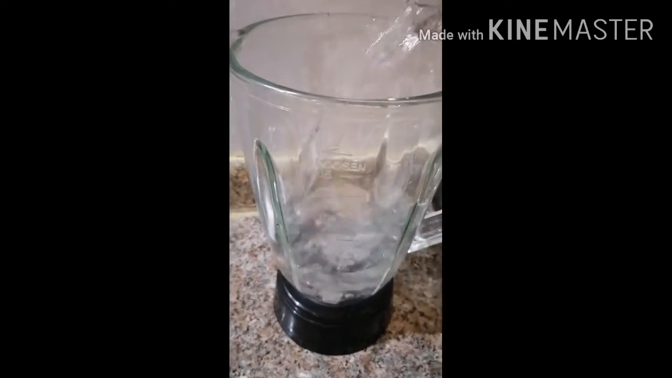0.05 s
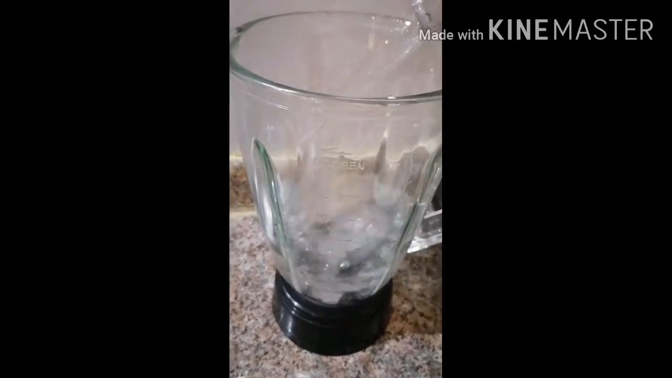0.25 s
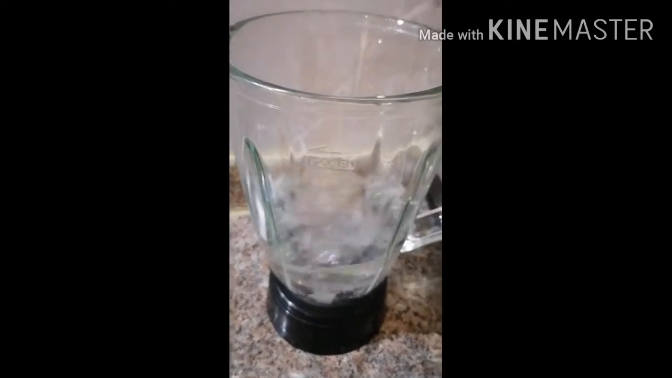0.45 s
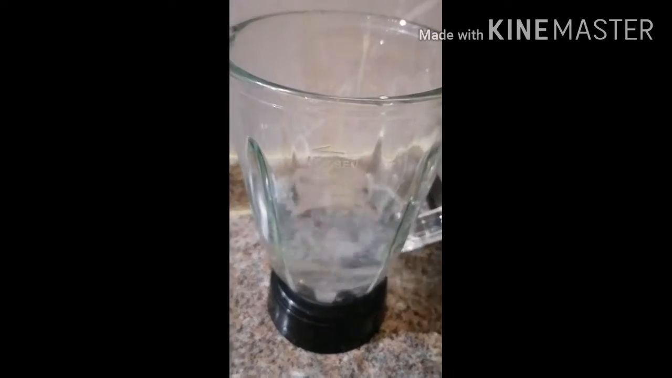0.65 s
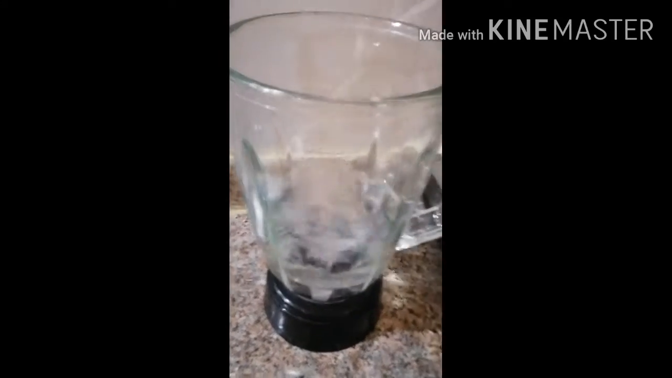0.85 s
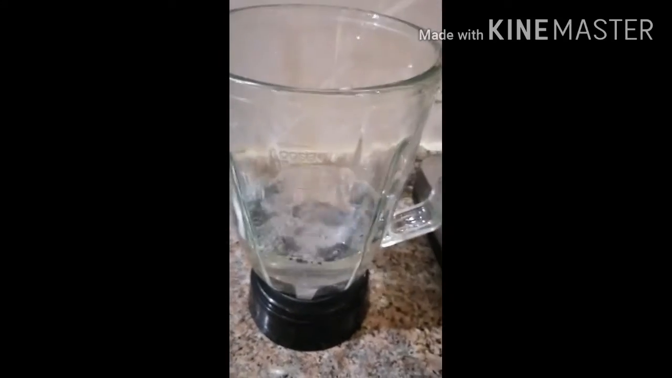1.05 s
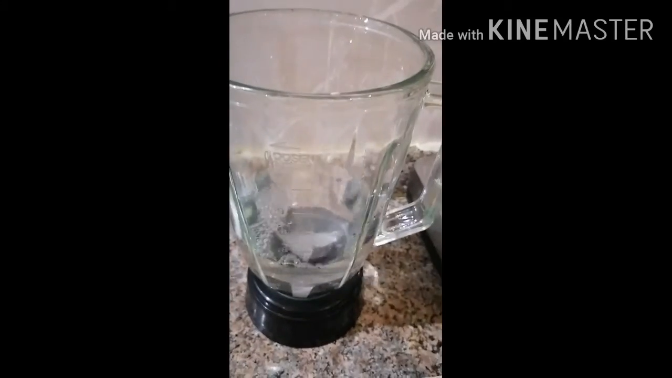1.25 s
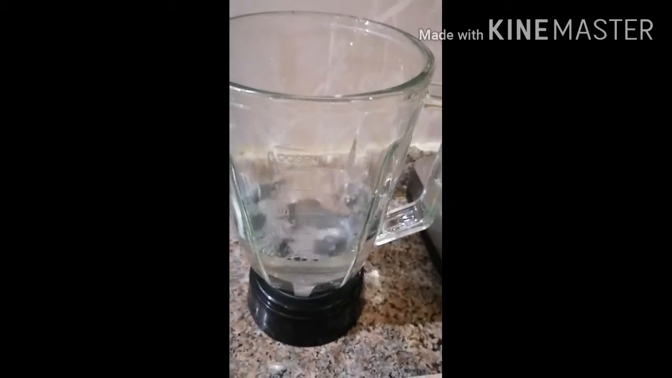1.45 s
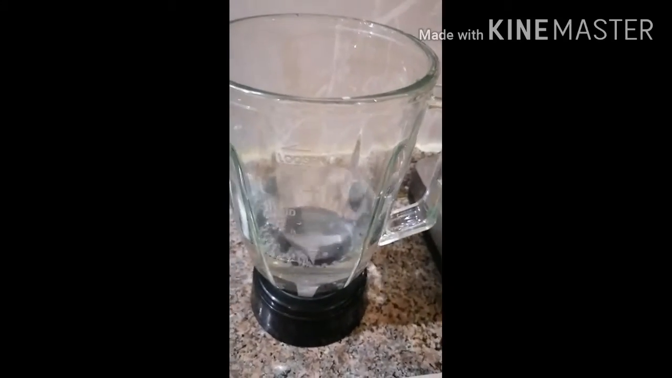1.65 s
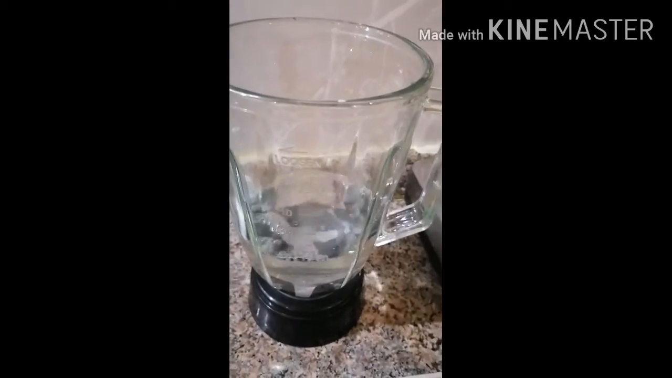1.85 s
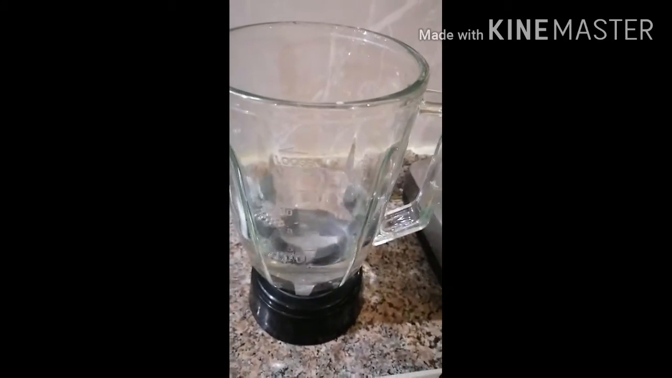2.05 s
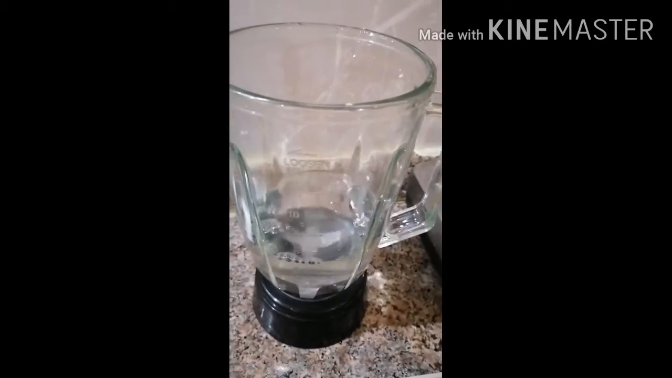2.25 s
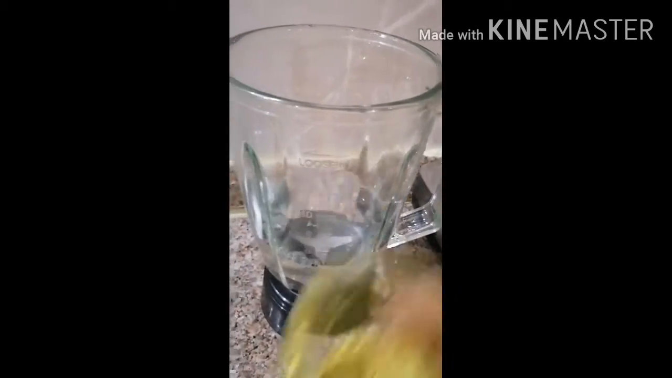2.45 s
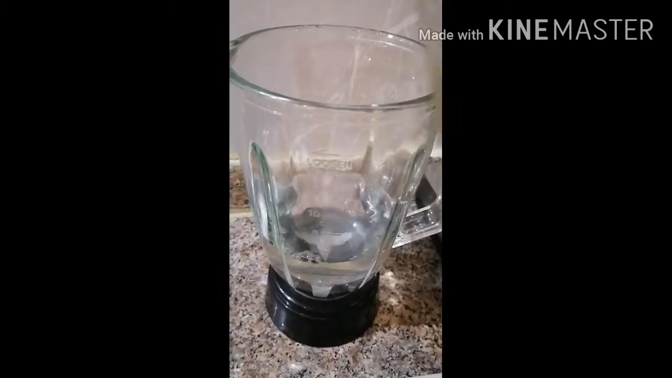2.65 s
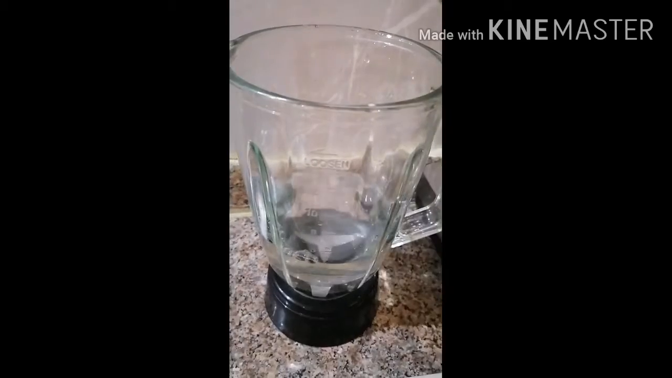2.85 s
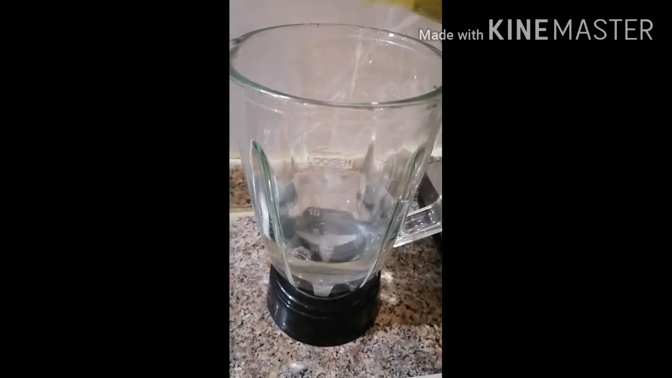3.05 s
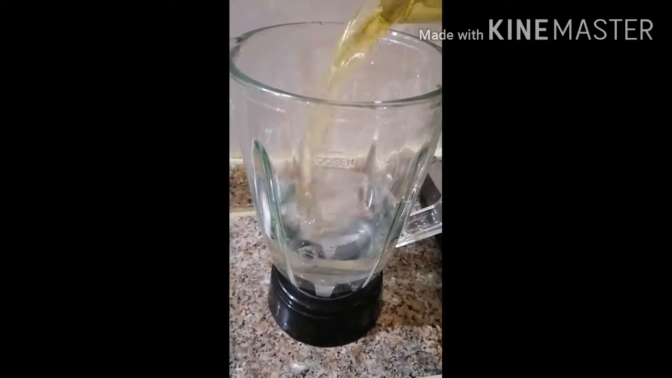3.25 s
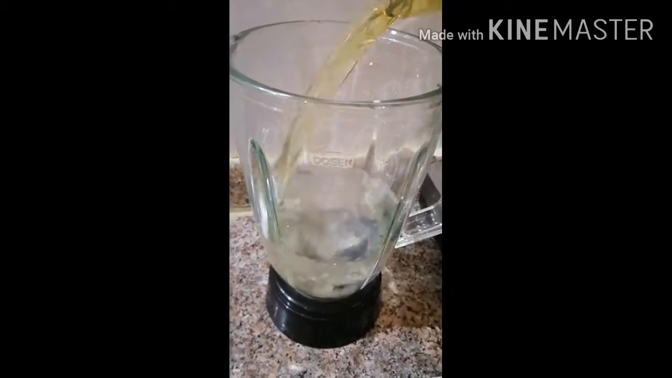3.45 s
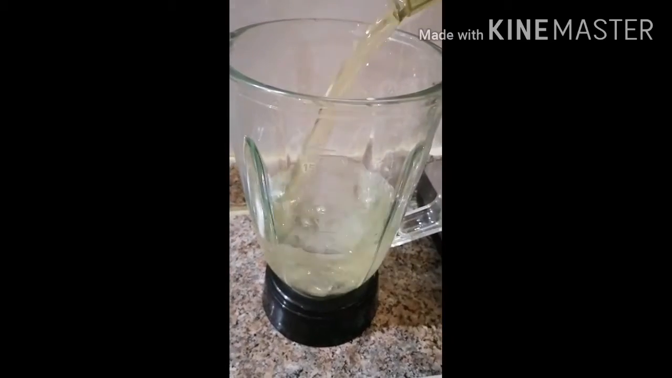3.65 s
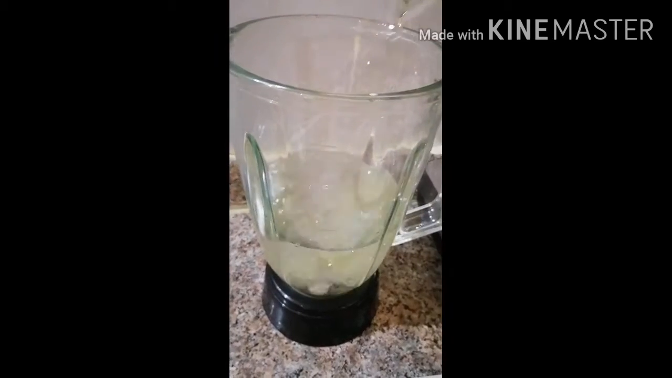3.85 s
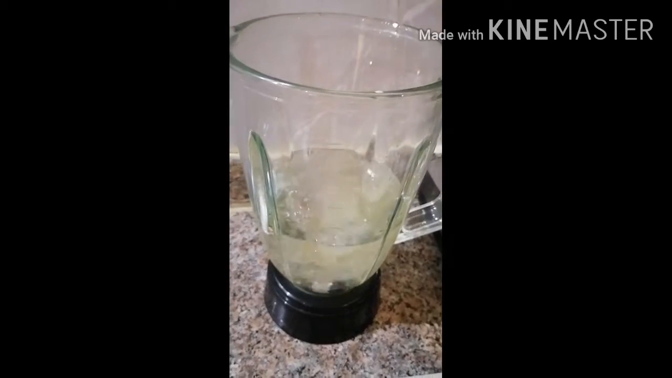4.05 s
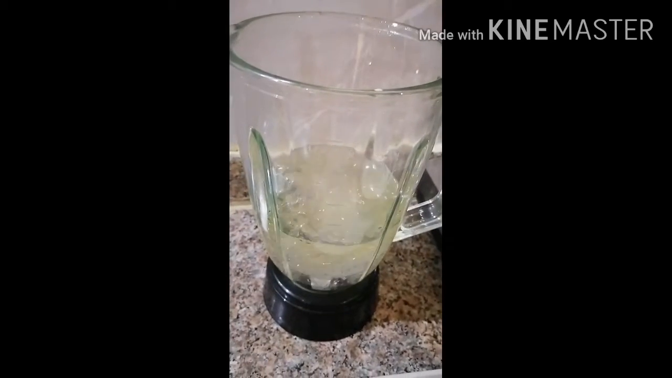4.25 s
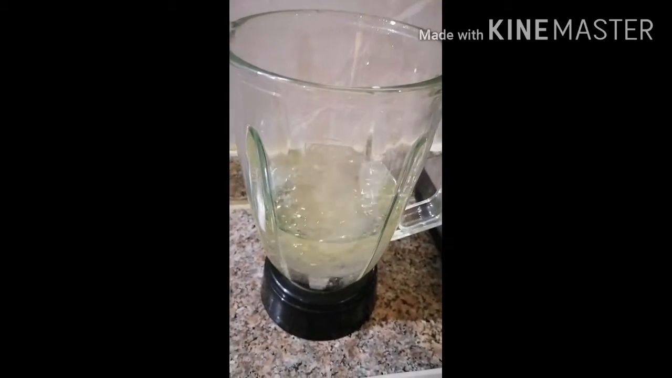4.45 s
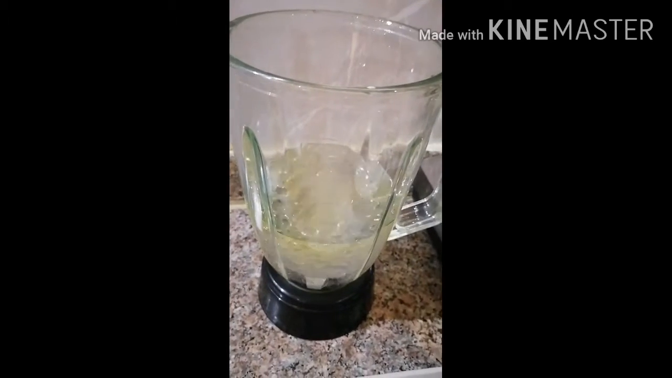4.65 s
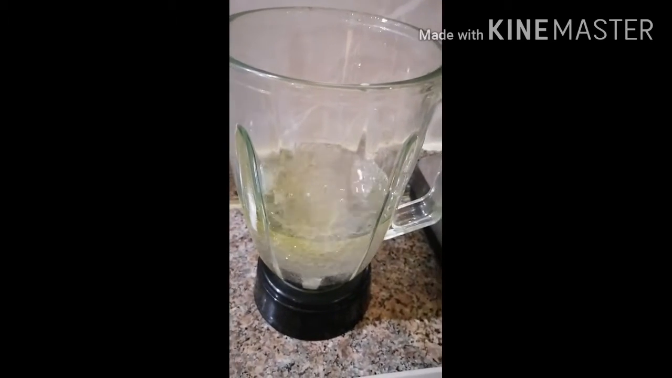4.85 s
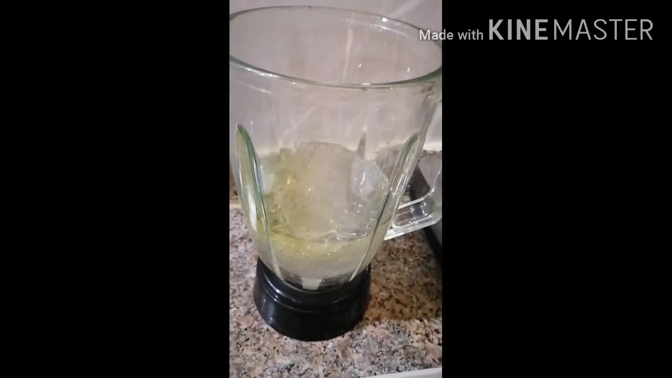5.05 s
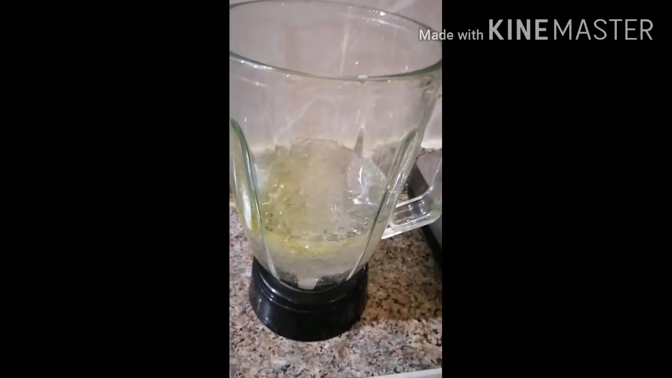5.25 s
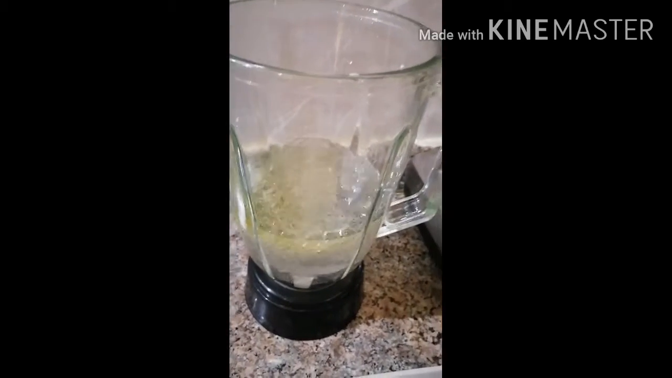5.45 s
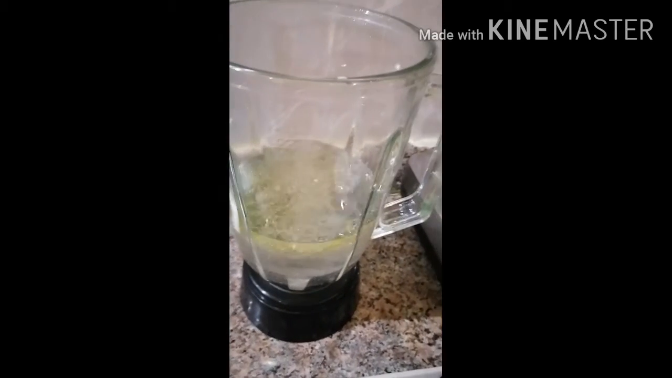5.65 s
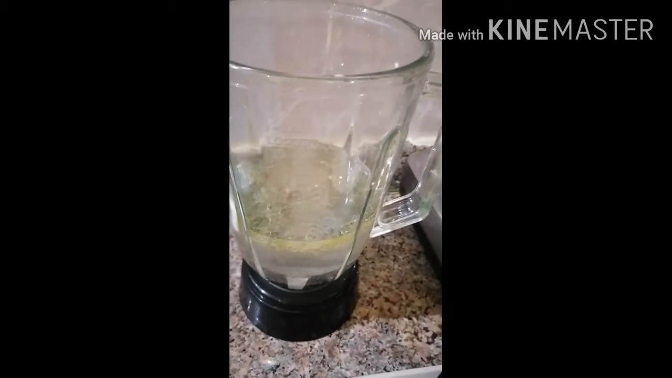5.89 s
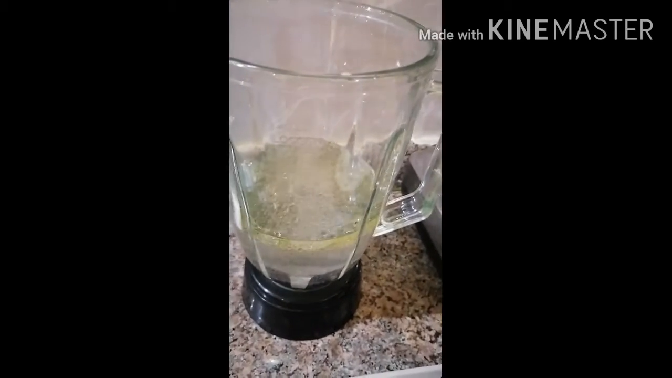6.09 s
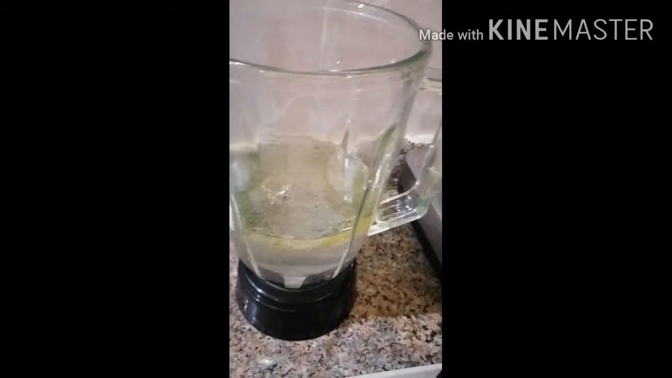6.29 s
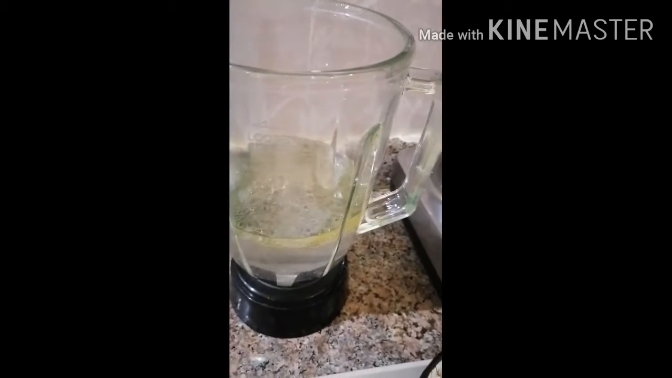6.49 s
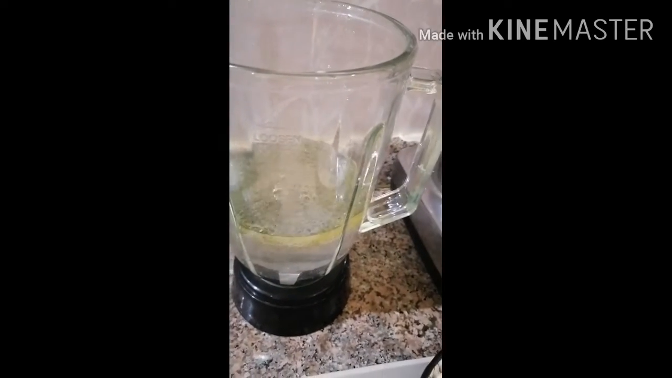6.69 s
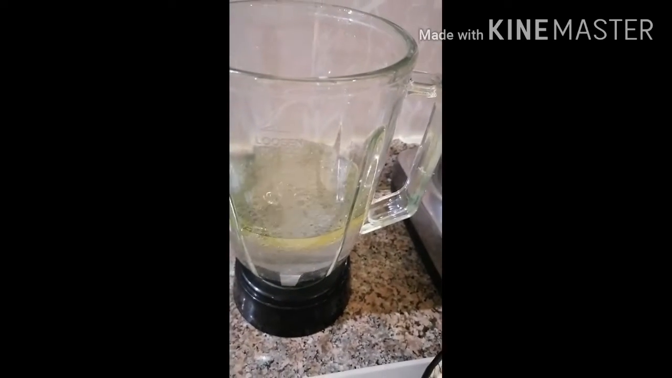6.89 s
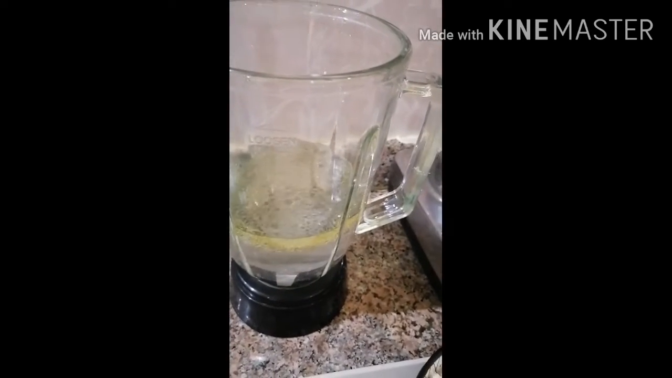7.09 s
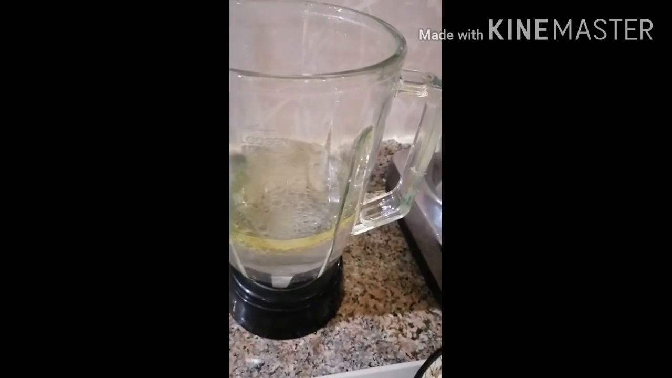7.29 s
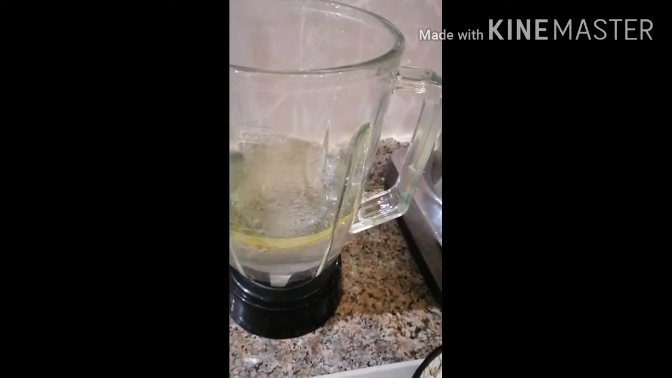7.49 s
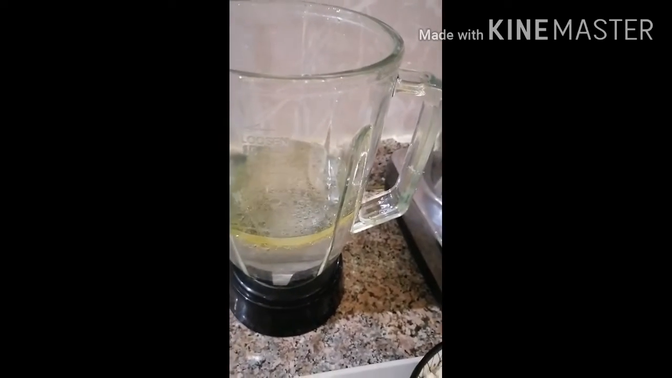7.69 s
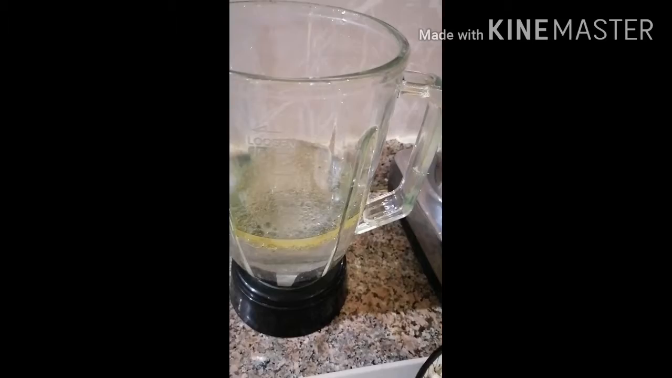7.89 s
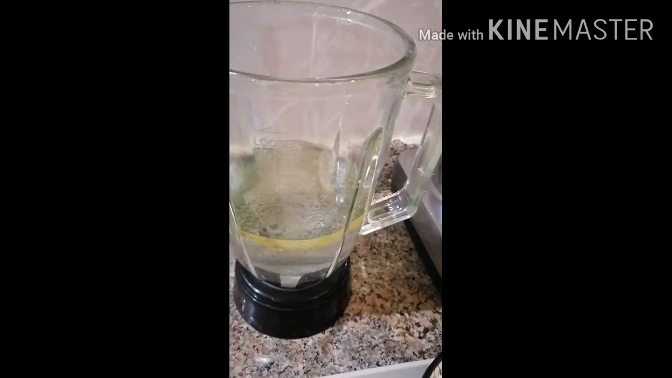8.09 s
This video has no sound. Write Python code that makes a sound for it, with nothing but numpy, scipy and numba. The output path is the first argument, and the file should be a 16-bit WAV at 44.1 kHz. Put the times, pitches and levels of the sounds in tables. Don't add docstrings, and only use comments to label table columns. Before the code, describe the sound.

Close to a phone in a hard, echoing kitchen, water gurgles and splashes into a glass jar, thinning to drips and popping foam. A jug lands with a sharp ringing knock. After a quieter gap, oil plops in briefly and dribbles out. A bottle is set down hard, and a small cap rattles at the end. A low motor hum and wavering duct howl continue behind.

```python
import sys
import numpy as np
from scipy import signal
from scipy.fft import irfft, next_fast_len
from scipy.io import wavfile
from scipy.ndimage import uniform_filter1d
from numba import njit

SR = 44100
rng = np.random.default_rng(int(sys.argv[2]) if len(sys.argv) > 2 else 0)


def decibels_to_gain(level_db):
    exponent = np.asarray(level_db, float) / 20
    return 10 ** exponent


def store_pcm(level_fs):
    pcm = np.round(np.clip(level_fs, -1, 1) * 32767).astype(np.int16)
    wavfile.write(sys.argv[1], SR, np.atleast_2d(pcm).T)


N = 358517

SHAFT_HZ = 59.045
# pitch in Hz, left minus right in dB.
LEFT_MINUS_RIGHT = [(60, 7.5), (200, 3), (400, 1), (700, 5), (1300, -1.5), (15000, 4.5)]
# start in seconds, blow in dB, contact in ms.
JUG_BLOWS = [
    (1.4497, -10, 0.47),
    (1.7555, -20.5, 1.64),
    (1.7975, -19.5, 1.43),
]


def on_hz(table, hz):
    pitch, value = np.array(table).T[:2]
    return np.interp(np.log(hz), np.log(pitch), value)


def on_time(table, s, off_db=-130):
    at, *columns = np.transpose(table)
    return [np.interp(s, at, column, off_db, off_db) for column in columns]


def walk(rate):
    hold = int(SR / rate)
    steps = np.repeat(rng.standard_normal(N // hold + 1), hold)
    return 1.195 * uniform_filter1d(uniform_filter1d(steps, hold), hold)[:N]


def band(hz, width, size=N):
    n = next_fast_len(size)
    bins = np.arange(n // 2 + 1)
    bell = np.exp(-.5 * ((bins * SR / n - hz) / (width / 2)) ** 2)
    x = irfft(bell * np.exp(2j * np.pi * rng.random(len(bins))), n)[:size]
    return x / np.std(x)


@njit
def ring(rows):
    out = np.zeros((2, N + 64))
    for s, hz, t60, rise, glide, left, right, lead in rows:
        fade, swell = np.exp(-np.log(1000) / (t60 * SR)), np.exp(-1 / (rise * SR))
        i, lag = int(s * SR) + 16, int(lead * SR)
        a, b, phase = 1., 1., 0.
        for k in range(i, min(i + int(t60 * SR), N)):
            phase += 2 * np.pi * hz * (1 + glide * (k - i) / SR) / SR
            a, b = a * fade, b * swell
            v = a * (1 - b) ** 2 * np.sin(phase)
            out[0, k] += left * v
            out[1, k + lag] += right * v
    return out[:, 16:N + 16]


def ring_rows(s, hz, t60, db, rise=.0003, glide=0., pan_db=0., lead=0.):
    hz = np.clip(hz, 30, .4 * SR)
    left, right = decibels_to_gain(db + pan_db / 2), decibels_to_gain(db - pan_db / 2)
    columns = np.broadcast_arrays(s, hz, np.maximum(t60, 2 / hz), rise, glide, left, right, lead)
    return np.stack(columns, -1).reshape(-1, 8)


def burst(s, db, hz, octaves, spread_s, t60, pan_db, count):
    draw = rng.standard_normal((len(s), count, 4))
    late = spread_s * np.abs(draw[..., 0]) ** 1.5
    hz = hz[:, None] * 2 ** (octaves * draw[..., 1])
    pan_db = pan_db + 3 * draw[..., 2]
    lead = .0002 + .00015 * draw[..., 3]
    return ring_rows(s[:, None] + late, hz, t60, db[:, None], 0.000067, 0., pan_db, lead)


def motor():
    # pitch in Hz, width in Hz, level in dB
    lines = [
        (58.8, 1.5, 1.5),
        (92.64, 2.48, -6.5),
        (122, 61, -10),
        (370, 47, -19.5),
    ]
    t = np.arange(N) / SR
    rumble = sum(decibels_to_gain(db) * band(hz, width) for hz, width, db in lines[1:])
    shaft = np.sqrt(2) * decibels_to_gain(lines[0][2] + 0.33 * walk(4.6)) * np.sin(2 * np.pi * SHAFT_HZ * t)
    return (rumble + shaft) * decibels_to_gain([[2.2], [-2.4]])


def compressor_buzz():
    # multiple of the shaft rate, left in dB, right in dB over the hum.
    multiples = [(2, -13, -18), (3, -12, -16), (4, -17, -18), (6, -19, -15), (8, -14, -9), (12, -27, -31),
                 (14, -34, -30), (18, -37, -35), (22, -33, -35), (24, -39, -35), (25, -42, -32),
                 (26, -35, -26), (36, -36, -34), (38, -38, -39), (40, -37, -36), (41, -34, -32),
                 (42, -28, -31), (43, -28, -31), (44, -44, -32), (45, -35, -34), (47, -33, -37),
                 (48, -37, -39), (52, -48, -35), (57, -38, -35), (82, -38, -37), (90, -46, -33),
                 (112, -42, -36), (113, -39, -39), (117, -48, -32), (119, -41, -37), (129, -37, -39)]
    turn = 2 * np.pi * np.cumsum(SHAFT_HZ * (1 + .00015 * walk(1.5))) / SR
    out = np.zeros((2, N))
    for k, left, right in multiples:
        phase = 2 * np.pi * (rng.random() + min(k / 40, 1) * rng.random((2, 1)))
        out += np.sqrt(2) * decibels_to_gain([[left], [right]]) * np.sin(k * turn + phase)
    return out


def rushing_air():
    # pitch in Hz, width in Hz, level in dB.
    whistles = [(2615, 130, -26), (5200, 390, -29.5), (6840, 2000, -23)]
    # pitch in Hz, level in dB per Hz.
    colour = [(15, -30), (36, -9.5), (69, -9), (130, -12.5), (287, -22.5), (453, -14), (576, -29.5),
              (862, -26), (1040, -30), (1930, -36), (2450, -33.5), (3670, -44.5), (6800, -50), (9130, -53),
              (15200, -53)]
    # pitch in Hz, left-right likeness from -1 to 1.
    likeness = [(60, 0.77), (130, 0.97), (300, 0.68), (650, 0.085), (1400, -0.3), (3000, -0.034)]
    air = np.zeros((2, N))
    for hz, width, db in whistles:
        air += decibels_to_gain(db + 2 * walk(2.46)) * np.array([band(hz, width), band(hz, width)])
    for hz in 30 * 2 ** np.arange(0, 9.1, 1 / 3):
        alike = np.clip(on_hz(likeness, hz), -1, 1)
        mid = np.sqrt(1 + alike) * band(hz, hz / 4)
        side = np.sqrt(1 - alike) * band(hz, hz / 4)
        db = -4.5 + on_hz(colour, hz) + 10 * np.log10(hz / 100) + 0.25 * walk(16)
        balance = decibels_to_gain(np.array([[.5], [-.5]]) * on_hz(LEFT_MINUS_RIGHT, hz))
        air += decibels_to_gain(db) * balance * np.array([mid + side, mid - side])
    return air


def howl():
    # pitch in Hz, level in dB.
    resonances = [(437, 0), (470, -8)]
    core = sum(decibels_to_gain(db) * band(hz, 26) for hz, db in resonances)
    return decibels_to_gain(-3.5 + 0.82 * walk(30)) * (core + decibels_to_gain(-7.5) * band(444.3, 60))


def duct():
    # middle in seconds, peak in dB over the hum.
    swells = [(.11, -3), (.25, -4), (.47, 6.5), (.62, -2), (.88, 5.5), (1.17, -1.5), (1.4, -0.5),
              (1.78, -20), (2.16, -18), (2.38, 1.5), (2.607, 5.5), (2.909, 0), (3.17, -2), (3.67, 8),
              (3.98, 7.5), (4.2, 2), (4.54, 6), (4.77, -14), (5.04, 5), (5.24, 5.5), (5.62, 5.5),
              (5.99, -0.5), (6.21, -10), (6.64, 7.5), (7.05, 6), (7.2, -14), (7.29, 7.5), (7.365, 11),
              (7.602, 1), (7.78, -7), (8.0, 3), (8.13, -23)]
    # multiple of the howl pitch, level in dB.
    overtones = [(1.92, -22.5), (2.849, -34.5)]
    gust_s, calm_db = 0.066, -2
    t = np.arange(N) / SR
    gusts = decibels_to_gain(calm_db) + sum(decibels_to_gain(db) * np.exp(-.5 * ((t - s) / gust_s) ** 2) for s, db in swells)
    right, other = howl(), howl()
    voice = np.array([.35 * right + .75 * other, 1.8 * right])
    for k, db in overtones:
        voice += decibels_to_gain(db + 2.0 * walk(12.0)) * np.array([band(440 * k, 40), band(440 * k, 53)])
    return gusts * voice


def appliance():
    # time in seconds, hum in dB as the gain control passes it.
    hum = [(0, -57.5), (.4, -53), (1.44, -50), (1.47, -71.5), (1.72, -55.5), (1.95, -55), (3.5, -55.5),
           (3.9, -52), (6.9, -50.5), (7.05, -52), (8.13, -50)]
    hum_db, = on_time(hum, np.arange(N) / SR)
    return decibels_to_gain(hum_db) * (motor() + rushing_air() + compressor_buzz() + duct())


def kitchen(x):
    # pitch in Hz, seconds to fade by 60 dB.
    fade_s = [(100, 0.63), (800, 0.59), (2500, 0.65), (6000, 0.63), (12000, 0.43)]
    # pitch in Hz, level in dB.
    colour = [(100, -8), (400, 7), (900, -3), (1700, 4.5), (3100, 0.5), (3800, -9), (5000, 8.5), (8000, 16),
              (12000, 5)]
    t = np.arange(SR) / SR
    tail = np.zeros((2, SR))
    for hz in 90 * 2 ** np.arange(0, 7.5, .25):
        fade = decibels_to_gain(on_hz(colour, hz) - 60 * t / on_hz(fade_s, hz))
        fade = fade * np.minimum(t / 0.0013, 1)
        noise = np.array([band(hz, hz / 5, size=SR) for _ in range(2)])
        tail += np.sqrt(hz / SR / 2) * fade * noise
    return signal.fftconvolve(x, tail, axes=1)[:, :N]


def struck(blows, modes, lead_ms, room_db):
    s, blow_db, contact_ms = np.array(blows).T[..., None]
    hz, db, t60 = np.transpose(modes)
    db = blow_db + db - 10 * np.log10(1 + (hz * contact_ms / 2000) ** 4)
    pan_db = on_hz(LEFT_MINUS_RIGHT, hz)
    direct = ring_rows(s, hz, t60, db, contact_ms / 1000, pan_db=pan_db, lead=lead_ms / 1000)
    crack = ring_rows(s, hz, 15 / hz, db + room_db, contact_ms / 3000)
    return direct, crack


def cap_rattle():
    # start in seconds, blow in dB, contact in ms.
    bounces = [(7.9945, -36, 0.29), (8.004, -37.5, 0.48), (8.0175, -56, 0.41), (8.032, -43, 0.33),
               (8.0415, -32, 0.27), (8.0665, -53, 0.55), (8.075, -36.5, 0.45)]
    # pitch in Hz, level in dB, ring in seconds.
    cap_modes = [(1110, -8, 0.022), (1910, 4.5, 0.0077), (3270, 10.5, 0.0074), (4100, 1.5, 0.029),
                 (4800, 1, 0.016), (6750, 1.5, 0.0047)]
    return struck(bounces, cap_modes, .15, room_db=-44.0)


def bottle_set_down():
    # start in seconds, blow in dB, contact in ms.
    blows = [
        (7.0185, -8.5, 0.56),
        (7.0325, -16, 0.77),
        (7.045, -15, 2.9),
        (7.285, -21, 3.3),
    ]
    # pitch in Hz, level in dB, ring in seconds.
    bottle_modes = [(157, -26.5, 0.17), (212, -17.5, 0.088), (250, -17.5, 0.075), (415, -24.5, 0.21),
                    (650, -24.5, 0.2), (846, 2, 0.026), (980, -7, 0.032), (738, -34, 0.5),
                    (1160, -36, 0.26), (1400, -13.5, 0.031), (1780, -13.5, 0.017), (2130, -36, 0.37),
                    (2135, -38, 0.59), (3520, -29.5, 0.027)]
    return struck(blows, bottle_modes, 0.12, room_db=-37.0)


def jug_set_down():
    # pitch in Hz, level in dB, ring in seconds.
    jug_modes = [(193, -20.5, 0.047), (274, -27.5, 0.14), (824, -16.5, 0.13), (1100, -3.5, 0.011),
                 (950, -1, 0.02), (1557, -8.5, 0.019), (1692, -0.5, 0.016), (2444, 1.5, 0.014),
                 (2650, 4, 0.016), (2830, -2.5, 0.016), (4580, -9, 0.043), (5200, -10.5, 0.018),
                 (6320, -2, 0.0078), (7930, -16, 0.056)]
    return struck(JUG_BLOWS, jug_modes, -.1, room_db=-41.5)


def jar_rings_on():
    # pitch in Hz, level in dB, ring in seconds.
    jar_modes = [(813, -36.5, 0.67), (979, -35.5, 0.36), (1336, -14, 0.036), (1670, -42.5, 0.9),
                 (1733, -37.5, 0.41), (2000, -44, 0.473), (2320, -37.5, 0.43), (2460, -39.5, 1.4),
                 (2870, -36.5, 0.32), (2750, -60, .35), (2880, -41, 0.84), (2890, -40.5, .49),
                 (3100, -33, .28), (3250, -35.5, 0.96)]
    return struck(JUG_BLOWS, jar_modes, -.1, room_db=-28.5)


def glass_touches():
    # start in seconds, blow in dB, contact in ms.
    touches = [
        (0.0, -38.5, 0.92),
        (3.588, -42, 2.5),
        (6.388, -32.5, 0.31),
    ]
    # pitch in Hz, level in dB, ring in seconds.
    touch_modes = [
        [(1015, 0, .6), (930, -3, .4), (520, -12, .3)],
        [(925, 0, .45)],
        [(7830, 0, .2), (10300, -6, .05)],
    ]
    parts = [struck([blow], modes, .2, room_db=-38) for blow, modes in zip(touches, touch_modes)]
    return [np.concatenate(part) for part in zip(*parts)]


def swarm(layer, rate, scatter_db, patchy_db):
    # time in seconds, flow in dB, plunge depth from 0 to about 1.
    pours = [
        [(0, -42.5, 0.21), (.13, -42.5, 0.46), (.22, -47, 0.3), (.45, -44.5, 0.24), (.61, -45.5, 0.35),
         (.69, -62, 0.65), (.8, -65, 0.33), (1.1, -59, 0), (1.43, -63, 0)],
        [(3.5, -52, 0.15), (3.56, -59, 0.57), (3.75, -67, 0.7), (3.85, -81, 1.1), (4.08, -84.5, 0.73),
         (4.2, -71, 0.33), (4.6, -67.5, 0.02), (4.82, -69.5, 0), (4.95, -100, 1)],
    ]
    # dB over the flow for water, the same for oil, dB gained by a deep plunge.
    layers = [
        (-24.5, -10, 35.5),
        (-19.5, -15.5, 26),
        (-2, 4.5, 2.5),
        (-9, -2, -8),
    ]
    draw = rng.random((int(rate * N / SR), 4)).T
    s = draw[0] * (N - 1) / SR
    *liquid_db, deep_db = layers[layer]
    levels = []
    for pour, liquid in zip(pours, liquid_db):
        curve = [(at, flow + liquid + deep_db * depth) for at, flow, depth in pour]
        levels.append(on_time(curve, s)[0])
    db = np.max(levels, axis=0) - scatter_db * np.log(draw[1])
    db = db + patchy_db * walk(90)[(s * SR).astype(int)]
    heard = db > -95
    return s[heard], db[heard], draw[2][heard], draw[3][heard]


def jar_air(layer, modes, rate, t60, gain_db, pan_db):
    s, db, pick, off = swarm(layer, rate, scatter_db=1.4, patchy_db=3.0)
    hz, width, mode_db = np.array(modes)[(pick * len(modes)).astype(int)].T
    hz = hz + 2.5 * (1 + 1.2 * np.exp(-s / .15)) * width * (off - .5)
    t60 = t60 * (1.16 + (7 * off) % 1)
    return ring_rows(s, hz, t60, db + mode_db + gain_db, 0.00054, 0.67, pan_db, 0.00025)


def gurgle():
    # pitch in Hz, width in Hz, level in dB.
    low_modes = [(571.6, 113.5, -5), (769, 85.5, -0.5), (908, 130, -16)]
    return jar_air(0, low_modes, rate=320, t60=0.11, gain_db=-2.5, pan_db=9.5)


def splash():
    # pitch in Hz, width in Hz, level in dB.
    high_modes = [(1328, 169, -13), (1750, 150, 3.5), (2134, 180, -13), (2480, 226, 7), (3192, 146, 2.5),
                  (4395, 360, -2.5)]
    return jar_air(1, high_modes, rate=2600, t60=0.035, gain_db=-0.5, pan_db=6.0)


def spray():
    # pitch in Hz, level of a drop in dB.
    colour = [(4000, -26.5), (5200, -1), (7200, 4), (8500, 0), (10500, -10.5)]
    s, db, pick, off = swarm(2, rate=3500, scatter_db=2.2, patchy_db=4.5)
    hz = 4000 * 2.6 ** pick
    db = db + on_hz(colour, hz) - 8.0
    drops = ring_rows(s, hz, 0.013, db, 0.00022, 0., 7 + 8 * (off - .5), .0004 * (pick / off % 1))
    s, db, pick, off = swarm(3, rate=3000, scatter_db=2.5, patchy_db=4.0)
    hz = 10000 + 5600 * pick
    mist = ring_rows(s, hz, 0.0048, db, 0.00026, 0., 3.0 + 8 * (off - .5), .0002)
    return np.concatenate([drops, mist])


def spatter():
    # start in seconds, peak in dB, top octave in dB, centre in Hz.
    water_drops = [(0.0293, -23.5, -32, 8230), (0.0817, -33, -14, 8160), (0.1177, -28, -10, 6600),
                   (.134, -41, -20, 7000), (.158, -40, -20, 8000), (0.169, -25, -38, 7000),
                   (.184, -32.5, -25, 7200), (0.2334, -40, -19, 7200), (0.261, -39, -6, 6350),
                   (0.2912, -32, -12, 7950), (.346, -41, -15, 9500), (0.3577, -39, -28, 7100),
                   (0.375, -32.5, -12, 8360), (0.415, -37, -14, 6530), (0.4648, -38, -9, 9100),
                   (0.538, -33, -19, 7310), (0.5901, -29, -12, 8250), (.604, -28, -25, 6200),
                   (.62, -32, -25, 7000), (0.6399, -37, -12, 6760), (0.664, -33, -11, 6950),
                   (0.6775, -36, -23, 7600), (.694, -39, -20, 5800), (0.7108, -55, 4, 9000),
                   (0.7592, -44, -14, 8250), (0.8364, -48.5, -4, 7800), (0.8748, -44.5, -4, 8000),
                   (0.9867, -53, -10, 8400)]
    last_dribble = [(4.1543, -36.5, -30, 7000), (4.16, -47, -12, 9600), (4.2031, -44, -25, 7100),
                    (4.212, -44, -8, 7500), (4.227, -41, -26, 7750), (4.265, -45, -11, 7200),
                    (4.2834, -35.5, -22, 8100), (4.3408, -46, -5, 9700), (4.366, -45.5, -31, 8150),
                    (4.395, -46, -21, 8400), (4.411, -53, -5, 9500), (4.4276, -53, 3, 10600),
                    (4.446, -38, -12, 8500), (4.4828, -59, 7.5, 11100), (4.5219, -52, 0, 10900),
                    (4.54, -43, -3, 11600), (4.5738, -46, -2, 8400), (4.587, -55, -1, 11000),
                    (4.6018, -38.5, -30, 7720), (4.6275, -54, -12, 9900), (4.64, -35, -20, 8500),
                    (4.651, -44, -6, 8500), (4.683, -43.5, -11, 10300), (4.704, -57, -3, 11100),
                    (4.7124, -41, -9, 10000), (4.7578, -47, 3, 10900), (4.782, -49, 3, 10900),
                    (4.791, -35, -20, 8100), (4.795, -45, -1, 9570), (4.889, -58, -2, 8900),
                    (4.9689, -69, 6, 12000)]
    # start in seconds, peak in dB, centre in Hz.
    oil_drops = [(3.4685, -48, 5140), (3.4877, -46, 5570), (3.4992, -38.5, 6300), (3.5354, -29.5, 7150),
                 (3.5539, -28.5, 5480), (3.5785, -37, 4800), (3.6252, -34.5, 5800), (3.6614, -48, 6600),
                 (3.6883, -36, 6320), (3.7286, -38, 5200), (3.7534, -44, 7040), (3.8, -51, 5500),
                 (3.849, -53, 12800), (4.0083, -37.5, 6100), (4.025, -38, 7150)]
    lone_drips = [(1.7553, -56, 7950), (1.7964, -51, 8040), (1.953, -57, 8000), (2.297, -56, 7530),
                  (2.34, -57.5, 8850), (2.4516, -62, 8500), (5.411, -41.5, 6700), (6.4044, -52, 8100),
                  (6.419, -48, 8500), (6.4456, -48, 7930)]
    # start in seconds, peak in dB, pitch in Hz.
    foam_pops = [(0.874, -48, 5700), (0.9063, -53, 8200), (0.9866, -56, 7300), (1.0185, -53, 7260),
                 (1.065, -49.5, 5750), (1.0964, -49, 8200), (1.1148, -49, 6840), (1.153, -45, 7760),
                 (1.1742, -47, 7270), (1.2276, -56, 5930), (1.2276, -53, 7700), (1.249, -45, 7800),
                 (1.275, -47.5, 6000), (1.3154, -45, 7200), (1.3662, -52, 8100), (1.3752, -51, 7160),
                 (1.4191, -51, 7450), (1.77, -54, 7740), (1.865, -59, 7800), (1.8925, -56, 8450),
                 (2.0034, -60, 8450), (2.1434, -61, 7090), (2.1923, -64, 7070), (2.21, -58, 8300),
                 (2.2485, -60.5, 7180), (2.5517, -64, 8400)]
    # start in seconds, peak in dB, centre in Hz.
    dry_ticks = [(2.8248, -47.5, 6300), (2.877, -36, 6500), (2.9685, -59, 8030), (3.209, -53, 8100),
                 (3.297, -56, 8200), (5.4103, -38, 6960), (6.216, -48, 6500), (7.021, -47, 5200)]
    s, db, top_db, hz = np.concatenate([water_drops, last_dribble]).T
    dull_s, dull_db, dull_hz = np.concatenate([oil_drops, lone_drips]).T
    s, db, hz = np.r_[s, dull_s], np.r_[db, dull_db], np.r_[hz, dull_hz]
    top_db = np.r_[top_db, np.full(len(dull_s), -26.0)]
    head = ring_rows(s + .0006, hz, 0.00087, db + 1.5, 0.00019, 0., 15.0, .0002)
    core = burst(s, db - 6.0, hz, 0.073, 0.0022, 0.012, 11.7, count=4)
    body = burst(s, db - 7.5, hz, 0.31, 0.0025, 0.0033, 5.3, count=24)
    top = burst(s, db + top_db, 13000 + 0 * hz, 0.225, 0.0048, 0.0044, 4.9, count=16)
    foam = burst(*np.transpose(foam_pops), 0.046, 0.0034, 0.005, 12.4, count=4)
    ticks = burst(*np.transpose(dry_ticks), .27, .0002, .0012, 4., count=10)
    return np.concatenate([head, core, body, top, foam, ticks])


def bubbles():
    # start in seconds, peak in dB, pitch in Hz.
    singles = [(0.0228, -53, 2370), (0.0485, -34, 1750), (0.104, -18.5, 2470), (0.2604, -39, 2490),
               (0.326, -34, 2650), (0.3645, -22.5, 2950), (0.4235, -31, 3250), (0.4723, -26.5, 2480),
               (0.521, -33, 2520), (.529, -30, 2480), (0.5456, -25, 1750), (0.599, -33, 1750),
               (0.6374, -21, 4100), (0.6654, -29.5, 3280), (3.5283, -27.5, 2450), (3.554, -20, 2980),
               (3.685, -30, 2910), (3.704, -35, 2560), (3.866, -42, 1670), (3.9883, -47, 2490),
               (4.0, -47, 3970), (4.0097, -42, 3270), (4.2277, -48, 2480), (4.229, -56, 3620),
               (.118, -19.5, 4000), (.122, -15, 5530), (.143, -27, 2280), (.376, -23, 5640),
               (.413, -34, 2530), (.438, -29, 3320), (.443, -34, 1880), (.512, -39, 2470),
               (.535, -31, 1680), (.612, -32, 1760), (.478, -36, 1660), (3.503, -34, 1624),
               (3.535, -33, 1750), (.3645, -29, 2330), (.3655, -32, 3330), (.29, -34, 5650),
               (3.598, -41, 1750), (3.708, -46, 1910), (.808, -46, 3240), (.875, -50, 5790),
               (3.687, -42, 2080), (3.745, -47, 2480), (3.815, -53, 2500), (3.856, -49, 2600),
               (3.888, -42, 1780), (3.934, -57, 3250), (4.008, -38, 1830), (4.026, -44, 3320),
               (4.098, -52, 5300), (4.1235, -38, 5230), (4.137, -46, 5400)]
    glugs = [(.345, -46, 723), (.39, -62, 762), (.425, -55, 740), (0.516, -48, 786), (.56, -50, 737),
             (0.607, -47, 734), (0.64, -48, 579), (3.528, -32.5, 604), (3.588, -28.5, 658),
             (3.524, -38, 770), (3.633, -49, 887), (3.685, -40, 708), (3.762, -41, 580),
             (3.772, -30.5, 590), (3.856, -40.5, 980), (3.886, -44, 743), (3.902, -36.5, 752),
             (3.648, -38, 760), (3.985, -47, 824), (4.012, -40.5, 816), (4.035, -43, 812)]
    # start in seconds, peak in dB, pitch in Hz, ring in seconds.
    plunge = [(3.454, -34, 2960, 0.034), (3.47, -38, 2310, .03), (3.484, -24, 2220, 0.039),
              (3.498, -25.5, 1956, 0.038), (3.527, -47, 393, 0.25), (3.532, -32, 250, 0.036)]
    s, db, hz = np.concatenate([singles, glugs]).T
    cycles = np.repeat([50, 40], [len(singles), len(glugs)])
    cycles = cycles * decibels_to_gain(-.45 * (db + 32.5))
    rising = ring_rows(s, hz, cycles / hz, db + 1, .0004 + .8 / hz, 1.5, 8, .00025)
    snap = burst(s, db - 11.0, hz * 1.27, 0.18, 0.0029, 0.0034, 1.1, count=8)
    s, db, hz, t60 = np.transpose(plunge)
    cavity = ring_rows(s, hz, t60, db + 5.5, 0.0024, -4.0, 9.1, 0.00026)
    return np.concatenate([rising, snap, cavity])


def scene():
    background = appliance()
    hits = [cap_rattle(), bottle_set_down(), jug_set_down(), jar_rings_on(), glass_touches()]
    direct, to_walls = (ring(np.concatenate(part)) for part in zip(*hits))
    liquid = ring(np.concatenate([gurgle(), splash(), spray(), spatter(), bubbles()]))
    echo = kitchen(to_walls + decibels_to_gain(-59) * liquid)
    return background + echo + direct + liquid


def low_pass(x):
    return signal.sosfilt(signal.butter(12, 16480, fs=SR, output="sos"), x)


def record(dry):
    hiss = decibels_to_gain(-81.5) * np.array([band(6600, 12000), band(9000, 12000)])
    top_cut = signal.ellip(8, .2, 60, 15300, fs=SR, output="sos")
    mix = signal.sosfilt(top_cut, dry + hiss)
    return low_pass(mix)


dry = scene()
out = record(dry)
store_pcm(out)
```